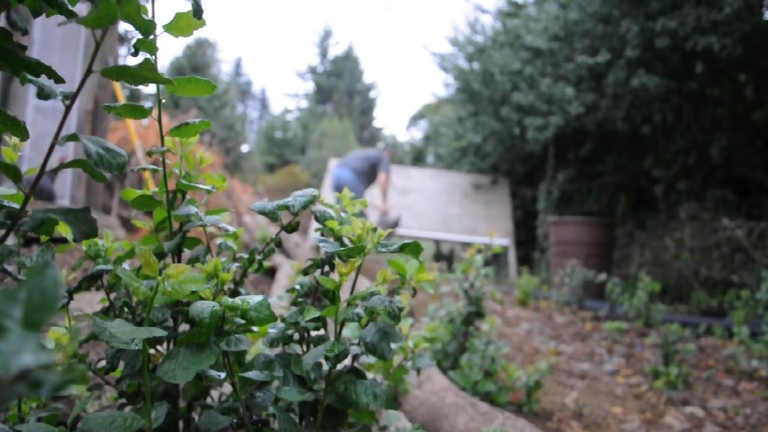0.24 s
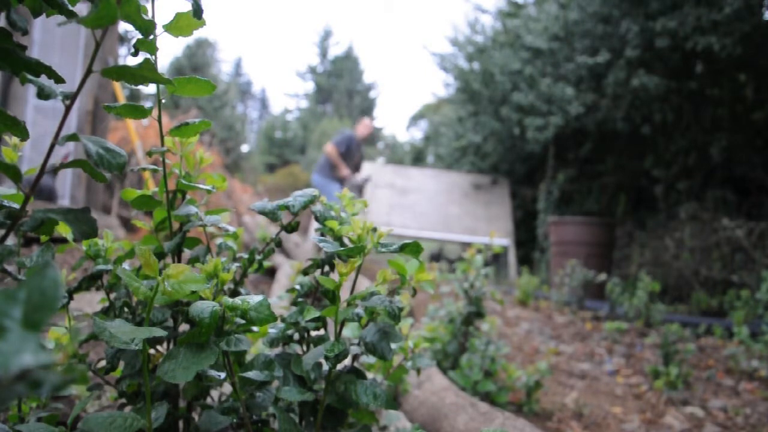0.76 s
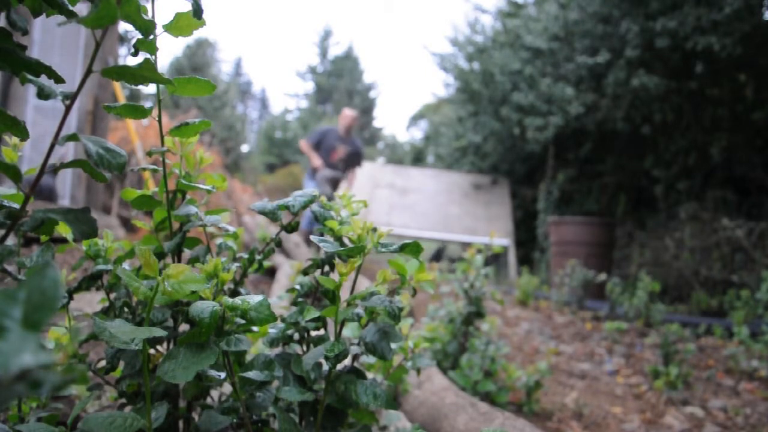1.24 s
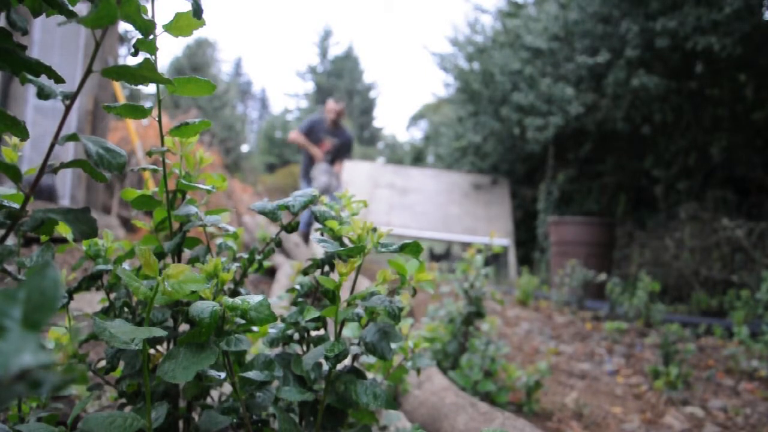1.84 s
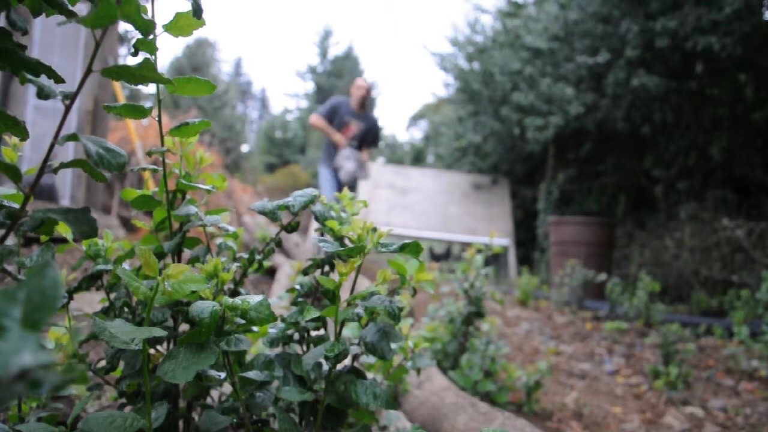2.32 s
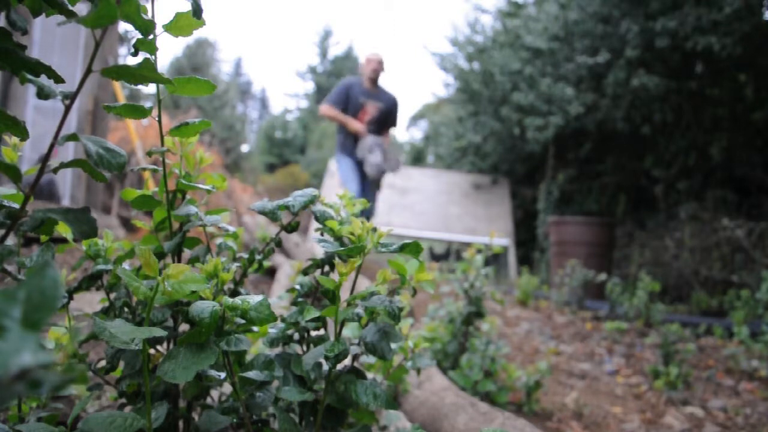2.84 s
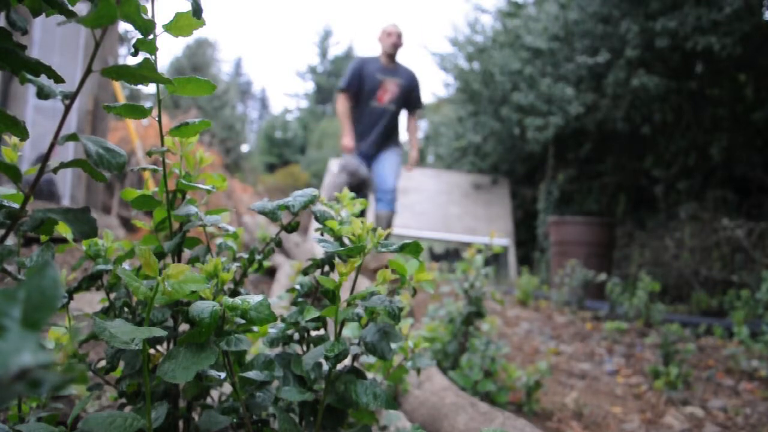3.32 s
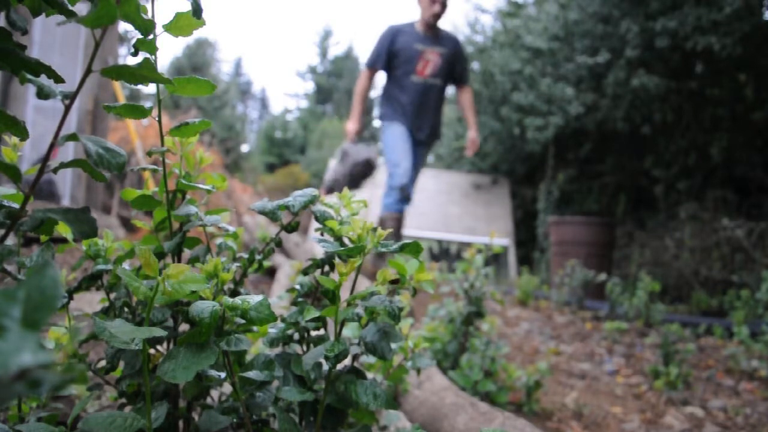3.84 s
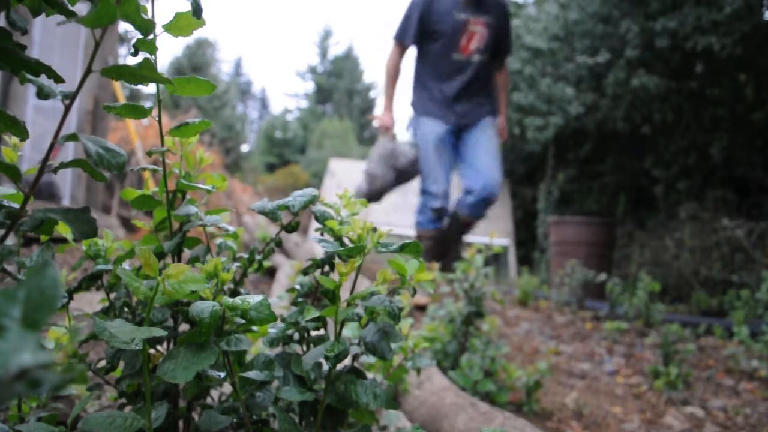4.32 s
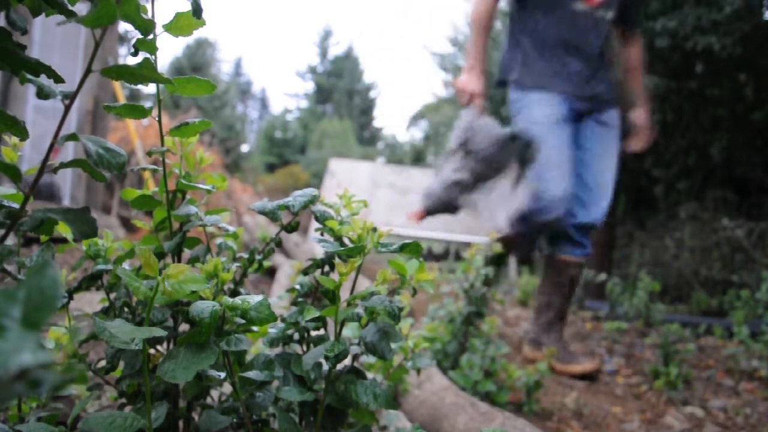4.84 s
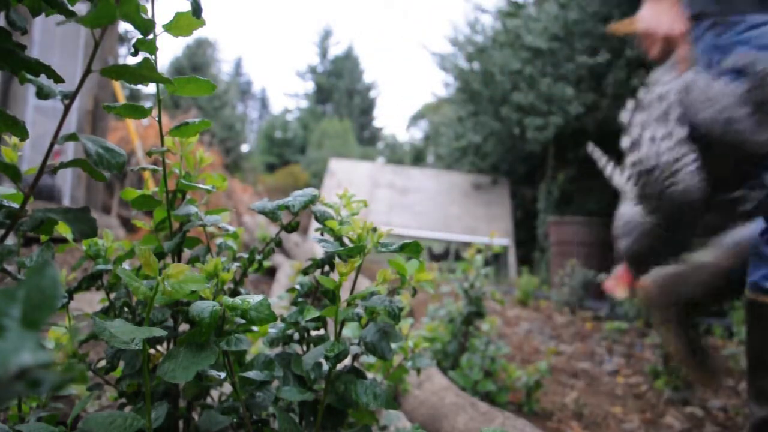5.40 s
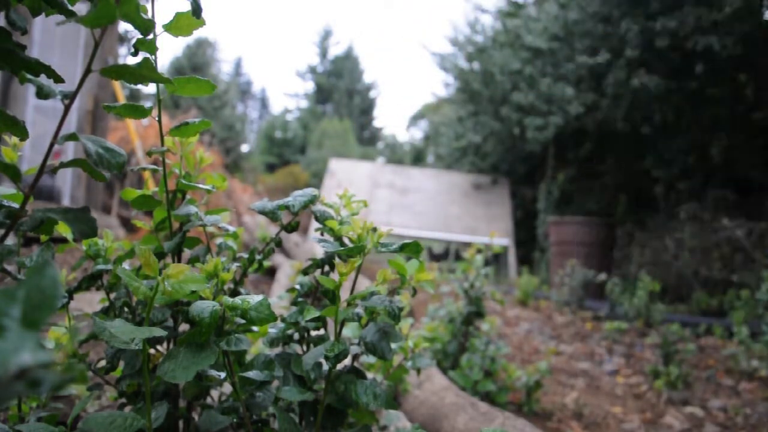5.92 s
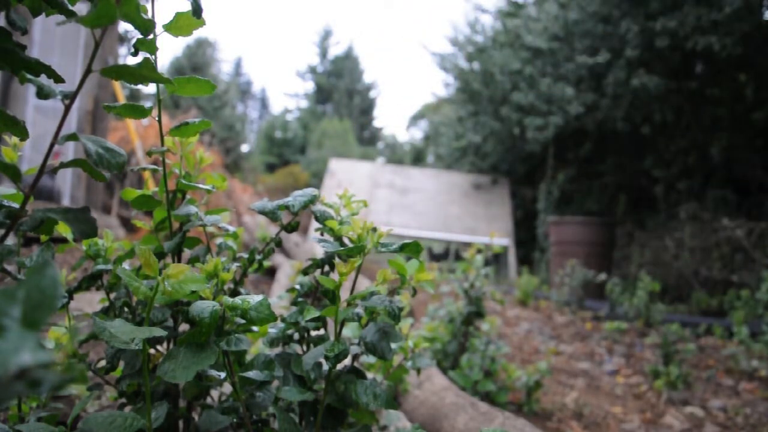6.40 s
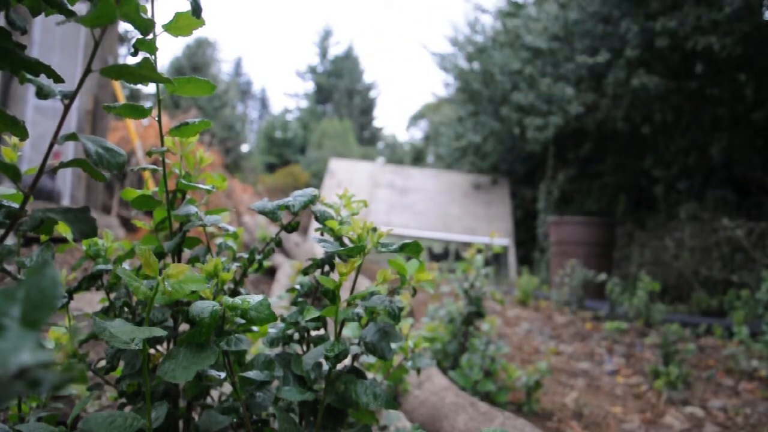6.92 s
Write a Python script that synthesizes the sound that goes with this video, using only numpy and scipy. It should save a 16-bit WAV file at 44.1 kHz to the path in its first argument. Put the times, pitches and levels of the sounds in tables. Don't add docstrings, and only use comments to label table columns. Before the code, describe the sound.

In an outdoor garden, a wooden coop lid slams and rattles to rest. One hen gives broken, whistling squawks while another clucks steadily, growing nearer as it is carried past. A farther hen grunts hoarsely. Feathers and leaves brush by, twigs snap and boots press crumbly soil. Distant traffic and leaves lie beneath. A small camera microphone among the leaves gives a narrow, dull, slightly clipped sound.

```python
import sys
import numpy as np
from scipy import signal
from scipy.fft import rfft, irfft, next_fast_len
from scipy.io import wavfile
from scipy.ndimage import uniform_filter1d, minimum_filter1d, map_coordinates

SR = 44100
rng = np.random.default_rng(int(sys.argv[2]) if len(sys.argv) > 2 else 0)


def unload_wav(signal):
    wavfile.write(
        sys.argv[1],
        SR,
        np.round(np.clip(np.atleast_2d(signal).T, -1, 1) * 32767).astype(np.int16),
    )


def invert_db(level):
    return 10 ** (np.asarray(level, dtype=float) / 20)


N = 315756

# centre in Hz, width in Hz, level in dB.
BEAK = [(2800, 300, 0), (3700, 330, 0), (4250, 350, -9)]


def unit(x):
    return x / np.sqrt(np.mean(x ** 2) + 1e-20)


def along(points, hz):
    f, v = np.transpose(points)
    return np.interp(np.log(hz + 1), np.log(f + 1), v)


def wobble(rate, size=N):
    knots = rng.standard_normal(int(size * rate / SR) + 4)
    return map_coordinates(knots, [np.arange(size) * rate / SR])


def phase(hz):
    return 2 * np.pi * np.cumsum(hz) / SR


def filtered(x, response):
    m = next_fast_len(len(x) + SR // 4)
    return irfft(rfft(x, m) * response(np.fft.rfftfreq(m, 1 / SR)), m)[:len(x)]


def resonant(modes):
    return lambda f: sum((-1) ** k * invert_db(db) * 1j * f * w / (c * c - f * f + 1j * f * w)
                         for k, (c, w, db) in enumerate(modes))


def spell(t, start, end, edge=0.0003):
    return np.clip(np.minimum(t - start, end - t) / edge, 0, 1)


def call(rows, edge):
    s, *cols = np.transpose(rows)
    t = np.arange(s[0], s[-1], 1 / SR)
    return round(s[0] * SR), t, spell(t, s[0], s[-1], edge), [np.interp(t, s, c) for c in cols]


def air():
    # time in seconds, traffic in dB, leaves in dB.
    air_levels = [(0.0, -37, -58.5), (0.56, -45, -47), (1.11, -46.5, -45.5), (1.25, -46, -43.5),
                  (1.91, -43, -45.5), (2.77, -47, -48), (3.6, -43.5, -41.5), (4.4, -41.5, -43.5),
                  (5.3, -41.5, -44.5), (6.2, -42, -45.5), (7.16, -40, -46.5)]
    # frequency in Hz, density in dB per Hz.
    traffic_shape = [(12, -50.5), (20, -6.5), (123, -9.5), (220, -9.5), (362, -11), (500, -15), (650, -37),
                     (1100, -120)]
    leaves_shape = [(150, -37.5), (250, -27), (363, -12), (736, -13), (865, -8.5), (908, -12.5),
                    (2060, -19), (2250, -16.5), (2420, -24), (4850, -20.5), (6300, -79), (10700, -120)]
    _, _, _, levels = call(air_levels, edge=.01)
    traffic_db, leaves_db = [np.pad(db, (0, N), "edge")[:N] for db in levels]

    def rush(shape):
        return unit(filtered(rng.standard_normal(N), lambda f: invert_db(along(shape, f))))

    traffic = invert_db(traffic_db + 1.5 * wobble(8)) * rush(traffic_shape)
    leaves = invert_db(leaves_db + 1.5 * wobble(14)) * rush(leaves_shape)
    return traffic + leaves


def lid():
    # frequency in Hz, level in dB, 60 dB decay in seconds.
    lid_modes = [(85.7, -29.5, 0.72), (161, -13, 0.73), (221, -10.5, 0.074), (286, -6, 0.16),
                 (413, -11.5, 0.097), (513, 0, 0.05)]
    # time in seconds, boards in dB, crack in dB.
    contacts = [
        (0.0314, -1.5, -25),
        (.037, -6.5, -7.5),
        (0.0408, 0, 2.5),
        (0.0434, -1.5, -5.5),
        (0.065, -10.5, -38.5),
        (.074, -11, -43.5),
        (.091, -15.5, -31.5),
    ]
    out, t = np.zeros(N), np.arange(SR // 2) / SR
    for s, db, crack_db in contacts:
        ring = sum(invert_db(level + rng.normal(0, 3) - 60 * t / t60) * np.sin(2 * np.pi * hz * t)
                   for hz, level, t60 in lid_modes)
        knock = invert_db(-60 * t / 0.036) * np.sin(2 * np.pi * 215 * t)
        knock += invert_db(0.5 - 60 * t / 0.018) * np.sin(2 * np.pi * 400 * t)
        splinter = filtered(rng.standard_normal(len(t)), lambda f: 1 / (1 + 1j * f / 1500))
        crack = invert_db(crack_db + 9.5 - 60 * t / 0.011) * splinter
        onset = np.sin(np.minimum(t / 0.0026, 1) * np.pi / 2) ** 2
        blow = onset * invert_db(db) * (invert_db(-17.0) * ring + 1.2 * knock)
        out[round(s * SR):][:len(t)] += blow + np.minimum(t / 0.0011, 1) * crack
    return out


def shiver():
    # Start, time the hum starts to die and end in seconds, then hum in dB, grit in dB.
    start, dies, end, low_db, grit_db = (.044, .21, .4, -22, -21)
    # frequency in Hz, level in dB.
    board_modes = [(72, -5), (100, -10), (166, 0), (215, -6), (320, -13)]
    t = np.arange(N) / SR
    hum = sum(invert_db(db + 3 * np.tanh(wobble(40))) * np.sin(2 * np.pi * hz * t + .8 * wobble(40))
              for hz, db in board_modes)
    grit = unit(filtered(rng.standard_normal(N), resonant([(500, 1100, 0)])))
    settling_db = -40 * np.maximum(dies - .06 - t, 0) - 75 * np.maximum(t - dies, 0)
    rumble = invert_db(settling_db) * (invert_db(low_db) * hum + invert_db(grit_db - 13.5) * grit)
    trickle = invert_db(grit_db - 60 * (t - start) / 0.11) * grit
    return spell(t, start, end, edge=0.018) * rumble + spell(t, start, end) * trickle


def chirp(s, length, from_hz, to_hz, db):
    peak = 0.75
    bend, edge_db, closing_db, third_db = 2.4, 16.5, -26, -30.5
    rows = [(s + u * length, from_hz + u ** bend * (to_hz - from_hz), db - edge * edge_db, u * closing_db - 5)
            for u, edge in [(0, 1), (peak / 2, .5), (peak, 0), (1, 1)]]
    return rows, third_db, 0


def squawks():
    # time in seconds, pitch in Hz, loudest tone in dB,
    # beak opening (second tone over first) in dB.
    rising = [(.27, 833, -46, -7), (.285, 915, -33.5, -9.5), (.33, 993, -30, -5.5),
              (.36, 1094, -20.5, -2.5), (.38, 1127, -21.5, -5.5), (.387, 1220, -49.5, -18)]
    onset = [(1.157, 598, -29, -1), (1.166, 607, -24.5, 7.5), (1.18, 643, -19, 8.5), (1.188, 624, -25.5, 6),
             (1.2, 648, -34, -10.5)]
    scream = [(1.176, 830, -37.5, -10), (1.186, 829, -20, -23), (1.202, 851, -13.5, -13),
              (1.228, 838.6, -9.5, -26), (1.27, 846.5, -10.5, -14), (1.292, 844.5, -12, -31),
              (1.306, 862, -12.5, -18), (1.326, 844, -11, -27), (1.34, 797, -23, -25)]
    rattle = [(2.21, 735, -44, -1.5), (2.23, 870, -31, -11), (2.27, 804, -27, 2.5), (2.328, 847, -19, 7),
              (2.332, 1120, -18.5, -6.5), (2.345, 1160, -33.5, 1)]
    yelp = [(2.37, 830, -42.5, 6.2), (2.378, 812, -26, 4.3), (2.386, 732, -18, 8), (2.394, 725, -13.5, 26),
            (2.397, 583, -22, 18), (2.403, 590, -20.5, 16), (2.408, 607, -40, 6)]
    sliding = [(2.6, 870, -37, -15.5), (2.615, 975, -28.5, 3.5), (2.627, 964, -18, 6.5),
               (2.64, 896, -16.5, 2.5), (2.648, 843, -20, 0)]
    falling = [(2.646, 851, -21, 2.5), (2.655, 792, -12.5, 9.8), (2.663, 754, -2, 19),
               (2.68, 780.4, -13, 44), (2.693, 726, -10, 23)]
    low = [(2.694, 665, -21.5, 11), (2.708, 574, -12, 10), (2.725, 579, -11, 11), (2.743, 564, -11.5, 9.2),
           (2.753, 575, -48.5, 6)]
    high = [(2.902, 930, -45.5, -16), (2.92, 1013, -21, 8.5), (2.94, 942, -11.5, 1),
            (2.955, 976, -12.5, 0.5), (2.97, 1003, -13, 10.5), (2.978, 1016, -30, -2.5)]
    dropped = [(2.98, 595, -4.5, 17), (2.984, 595.6, -6, 17), (3.0, 580.5, -10.5, 16), (3.035, 563, -9, 16),
               (3.045, 545, -31.5, 8.6)]
    faint = [(3.36, 793, -45, -26), (3.45, 813, -43, -4), (3.53, 746, -48.5, -3)]
    arched = [(5.098, 739, -32.5, -12), (5.125, 800, -28, -6), (5.14, 743.5, -21, 7), (5.17, 768, -19.5, 9),
              (5.2, 787, -22, 9), (5.225, 804, -24, 3.5), (5.255, 725, -43.5, 1)]
    gasp = [(5.266, 731, -36, 7.4), (5.276, 740, -14, 14.8), (5.29, 714, -17.5, 6.1)]
    # curve, third tone against the loudest in dB, the tones above in dB.
    held = [(rising, -27.5, 0), (onset, -6.5, 0), (scream, -20, 2.5), (rattle, -14, -3), (yelp, 0, -6),
            (sliding, -21.5, 0), (falling, -6, -5.5), (low, -5.5, 1.3), (high, -20, 3.3),
            (dropped, -15, 2.9), (faint, -26, 0), (arched, -16, 2.4), (gasp, -11, 0)]
    fourths = [5, -5.5, 7, -2.5, -0.5, -2, 2.5, 5, 1.5, 2, -10, -6.5, -1.5]
    # start in seconds, length in seconds, from Hz, to Hz, peak in dB.
    chirps = [
        (.42, 0.029, 773, 1596, -22.5),
        (0.481, 0.024, 893, 1596, -17),
        (0.524, 0.025, 1120, 1260, -44),
    ]
    # start and end in seconds, throb in Hz, throb depth 0-1, hoarseness 0-1.
    breaks = [(.27, .36, 95, .2, .16), (1.15, 1.205, 310, .1, .3), (1.195, 1.31, 300, 0, .035),
              (1.3, 1.35, 200, 0, .15), (2.21, 2.33, 103, .45, .12), (2.37, 2.42, 150, .1, .1),
              (2.645, 2.705, 125, .3, .12), (2.72, 2.76, 145, .1, .08), (2.9, 2.93, 150, .2, .2),
              (2.975, 2.986, 300, .1, .2), (3.35, 3.54, 90, .2, .2), (5.095, 5.26, 58, .55, .17),
              (5.26, 5.3, 90, 0, .2)]
    # start and end in seconds, half-pitch tones in dB.
    halvings = [
        (1.155, 1.211, -4),
        (1.271, 1.344, -9.5),
        (2.694, 2.76, -19.5),
        (2.98, 3.027, -42.5),
    ]
    # frequency in Hz, level in dB.
    upper = [(1700, 17), (2600, -2.5), (3400, -1.5), (4200, -5.5), (5000, -11.5)]
    # centre in Hz, width in Hz, level in dB.
    rasp_air = [(1400, 2700, -0.5), (2170, 420, 0), (3500, 1900, -1)]
    out, air_gain = np.zeros((2, N))
    notes = held + [chirp(*row) for row in chirps]
    for (rows, third_db, upper_db), fourth_db in zip(notes, fourths + [0] * len(chirps)):
        at, t, gate, (hz, db, open_db) = call(rows, edge=0.0015)
        n = len(t)
        first_db, second_db = db - np.maximum(open_db, 0), db + np.minimum(open_db, 0)
        third_db = third_db + db + .9 * (db - db.max())
        hoarse = .045 + sum(spell(t, a, b, edge=.005) * rough for a, b, _, _, rough in breaks)
        throb = 1 + sum(spell(t, a, b) * depth * np.sin(phase(rate * (1 + 0.21 * wobble(44, n))))
                        for a, b, rate, depth, _ in breaks)
        halved = sum(spell(t, a, b, edge=0.021) * invert_db(half_db) for a, b, half_db in halvings)
        turn = phase(uniform_filter1d(hz, size=90) * (1 + 0.0044 * wobble(59.6, n))) + hoarse * wobble(550, n)

        sizes = {1: invert_db(first_db), 2: invert_db(second_db), 3: invert_db(third_db + 2.3 * wobble(40, n))}
        for k in range(4, 9):
            tilt_db = along(upper, k * hz) - along(upper, 3 * hz)
            waxing_db = 3.5 * wobble(37, n)
            sizes[k] = invert_db(third_db + upper_db + 0.29 * (db - db.max()) + tilt_db + waxing_db)
        sizes[4] = sizes[4] * invert_db(fourth_db)
        for k in np.arange(8) + .5:
            sizes[k] = halved * invert_db(db - 16 * abs(np.log2(k * hz / 2150)) + 3.5 * wobble(28, n))
        tone = sum(size * np.sqrt(2) * np.sin(k * turn + rng.uniform(0, 2 * np.pi)) for k, size in sizes.items())
        out[at:at + n] += gate * tone * throb * (1 + 0.17 * hoarse * wobble(650, n))
        air_gain[at:at + n] += gate * (hoarse - .033) * invert_db(db - 2.5 + 5.5 * wobble(120, n))
    return out + filtered(air_gain * rng.standard_normal(N), resonant(rasp_air))


def snaps(hz, rasp):
    n = len(hz)
    cycles = .55 + np.cumsum(hz * (1 + .4 * rasp * wobble(260, n))) / SR
    sizes = invert_db(10 * rasp * np.tanh(rng.standard_normal(n)))
    snap = np.diff(np.floor(cycles), prepend=0) * sizes
    hiss = rng.standard_normal(n) * np.exp(-3 * (cycles % 1))
    return unit(unit(snap) + .9 * rasp * unit(hiss)), cycles


def clucks():
    # start in seconds, length in seconds,
    # settled pulse rate in Hz, throat in dB, mouth opening in dB.
    far_clucks = [(0.362, 0.1, 347.3, -35, 0), (0.615, 0.068, 333, -35.5, -3.5),
                  (0.821, 0.09, 347.6, -33.5, 0), (1.016, 0.069, 284.8, -29.5, 2),
                  (1.155, 0.067, 324.4, -34, 7.5), (1.38, 0.096, 330.8, -30.5, -9.5),
                  (1.62, 0.081, 332.3, -34, -11), (1.864, 0.068, 329.6, -30, -3.5),
                  (2.111, 0.08, 327, -31.5, -4), (2.406, 0.056, 298.2, -29, -2),
                  (2.647, 0.064, 326.8, -23.5, 4), (2.904, 0.061, 341, -24, 2.5),
                  (3.189, 0.08, 367.3, -26, -2)]
    near_clucks = [(3.523, 0.051, 340, -25, -1.5), (3.816, .053, 231.4, -30, 3),
                   (4.0, 0.052, 385.2, -19.5, 2.5), (4.234, 0.048, 347.9, -19, 1),
                   (4.463, 0.054, 371, -19, 3.5), (4.722, 0.066, 319.5, -21.5, 4),
                   (4.987, 0.053, 286.6, -21.5, 4), (5.28, 0.038, 341, -13, 4.5),
                   (5.549, 0.062, 274, -18, 4), (5.957, 0.091, 218.1, -22, 0),
                   (6.3, 0.07, 248.6, -20.5, -2.5), (6.891, 0.052, 319.6, -17.5, 2)]
    rasps = [.08, .35, .3, .25, .2, .2, .18, .2, .25, .36, .2, .2, .05, .13, .4, .15, .2, .22, .33, .36, .2,
             .4, .45, .36, .09]
    # swell from start to end in dB, beak turned to or from the camera in dB.
    turns = [(-0.5, -3.5), (-6, -1), (-4.5, -2), (-4, -3.5), (-8, 9.5), (12.5, -2), (-11.5, -3.5),
             (-6.5, -2), (-3.5, 0), (-11, -2), (-10, 0), (-2, -1), (2.5, -7), (8, -5.5), (-9, 2.5),
             (0.5, -3.5), (-1, 1), (-0.5, 2), (1, 3.5), (2, 7), (2, -1.5), (-4.5, 3.5), (-2, 1.5),
             (2.5, -1), (5.5, -4.5)]
    stretches = [0.0021, -0.02, 0.0098, -0.043, 0.019, -0.0061, 0.026, -0.1, 0.02, -0.017, 0.039, -0.019,
                 0.0014, -0.053, 0.0033, -0.036, 0.031, 0.021, -0.0021, -0.04, -0.049, -0.0085, 0.0073,
                 0.015, 0.0058]
    # centre in Hz, width in Hz, level in dB.
    windpipe_modes, mouth_modes = [(647, 390, -1.5)], [(1300, 137, 3.5), (1540, 470, -3), (2126, 560, -11)]
    # centre in Hz, width in Hz, level in dB.
    far_beak = [(3125, 480, 3.5), (3830, 220, -2), (2500, 300, -2.5)]

    def walls(f):
        return 1 / (1 + (f / 2300) ** 10) ** .5 / (1 + 1j * f / 4000)

    out = np.zeros(N)
    each = zip(far_clucks + near_clucks, rasps, turns, stretches)
    for k, ((s, length, hz, db, open_db), rasp, (swell_db, turn_db), stretch) in enumerate(each):
        at, t, gate, (u,) = call([(s, 0), (s + length, 1)], edge=.002)
        n, near = len(t), k >= len(far_clucks)
        rise = 0.3 * max(1 - rasp / .5, 0) * np.exp((s - t) / 0.016)
        hz = hz * (1 - rise - .07 * u ** 2)
        db = db - 4 * np.exp((s - t) / 0.02) - 6.5 * u ** 3 + swell_db * (u - .5)
        chest_db = (-6.5 if near else -4.5) - 0.66 * open_db
        beak_db = (-7.5 if near else -2) - 10 * rasp + turn_db
        source, cycles = snaps(hz * (1 - 0.29 * np.exp((t[0] - t) / 0.0046)), rasp)
        breath = (.15 + rasp) * rng.standard_normal(n) * np.exp(-2 * (cycles % 1))
        opening_db = open_db + 9 * (u - .5)
        fade = gate * np.clip((t[-1] + .002 - t) / .009, 0, 1)
        scale = 1 + np.clip(stretch, -.15, .15)

        def patch(depth_db):
            return fade * invert_db(db + depth_db * wobble(70, n))

        def ring(x, response):
            return filtered(np.pad(x, (0, 900)), lambda f: response(f / scale))

        pipe = ring(patch(2.8) * invert_db(14.5 - opening_db / 2) * source,
                    lambda f: resonant(windpipe_modes)(f) * walls(f))
        mouth = ring(patch(2.0) * invert_db(14.5 + opening_db / 2) * (source + breath),
                     lambda f: resonant(mouth_modes)(f) * walls(f))
        effort = invert_db(beak_db + 13.5) * np.sin(np.pi * u ** 0.87)
        beak = sum(ring(patch(2) * effort * (source + 1.3 * breath),
                        lambda f: invert_db(top_db) * resonant([(c, 2.1 * w, 0)])(f) ** 2)
                   for c, w, top_db in (BEAK if near else far_beak))
        out[at:][:n + 900] += mouth - pipe + beak
        hum = np.cos(2 * np.pi * cycles + 0.015) * (1 + rasp * wobble(150, n))
        out[at:][:n] += spell(t, t[0], t[-1]) * invert_db(db + chest_db + 2.5) * hum
    return out


def grunts():
    # peak time in seconds, peak in dB, beak against it in dB.
    grunt_calls = [
        (3.36, -27, -15),
        (3.71, -20, -18),
        (3.897, -22.5, -27),
        (4.074, -26, -12.5),
        (4.452, -24, -13),
        (4.657, -22.5, -40),
        (4.878, -20.5, -24),
        (5.924, -21, -34),
    ]
    low, high = np.zeros((2, N))
    u = np.arange(0, 1, 1 / (0.046 * SR))
    for s, db, beak_db in grunt_calls:
        pulses = snaps(250 + 60 * u, 1.0)[0] + rng.standard_normal(len(u))
        source = np.sin(np.pi * u ** 0.83) * np.clip(pulses, -2.5, 2.5)
        at = round((s - .012) * SR)
        low[at:][:len(u)] += invert_db(db + 5.5) * source
        high[at:][:len(u)] += invert_db(db + beak_db + 8.5) * source
    throat = resonant([(830, 264, 3.5), (1200, 70, 1.5)])
    return filtered(low, throat) + filtered(high, resonant(BEAK))


def songbird():
    start, end, hz, db = (3.55, 3.87, 3620, -57)
    t = np.arange(N) / SR
    whistle = np.sin(phase(hz * (1 + .02 * wobble(55))))
    return spell(t, start, end) * invert_db(db + 6.4 * wobble(56)) * whistle


def brushes():
    # start in seconds, length in seconds, centre in Hz, level in dB.
    swells = [(4.05, .17, 1000, -49), (4.284, 0.11, 900, -41), (4.613, 0.16, 800, -42),
              (5.096, 0.25, 1086, -34), (5.378, 0.2, 800, -44), (5.666, .1, 1200, -48),
              (5.816, 0.092, 700, -54.5), (6.026, .13, 800, -37.5), (6.433, 0.091, 900, -49),
              (6.598, 0.2, 1100, -45.5), (6.651, 0.073, 4000, -52), (6.765, 0.097, 4000, -45.5),
              (7.023, 0.075, 900, -47)]
    out = np.zeros(N + SR)
    for s, length, hz, db in swells:
        u = np.arange(0, 1, 1 / (length * SR))
        grit = invert_db(4 * wobble(150, len(u))) * rng.standard_normal(len(u))
        rustle = unit(filtered(grit, lambda f: resonant([(hz, 1600, 0)])(f) ** 2))
        out[round(s * SR):][:len(u)] += invert_db(db) * np.sin(np.pi * u) * rustle
    return out[:N]


def boots():
    # time in seconds, peak in dB, pitch in Hz.
    twigs = [(4.335, -28, 3730), (4.379, -22.5, 3060), (4.637, -22, 904), (4.683, -24, 3500),
             (4.694, -10, 790), (5.094, -19, 866), (5.218, -26, 2500), (5.25, -26, 4210),
             (5.421, -33.5, 4000), (6.094, -18.5, 1780), (6.817, -32.5, 837)]
    # time in seconds, peak in dB, pitch in Hz.
    clods = [(4.38, -24.5, 450), (5.409, -44, 580), (5.726, -20.5, 900), (5.776, -25, 790),
             (5.813, -30, 600), (5.894, -25, 794), (6.125, -22.5, 864), (6.477, -32, 694),
             (6.494, -21, 600), (6.513, -32.5, 810), (6.646, -29, 1000), (6.665, -29.5, 1470),
             (6.701, -36, 1340), (6.719, -28, 1250), (6.731, -30, 1400), (7.017, -20.5, 770),
             (7.027, -37.5, 1400), (7.059, -38, 1600), (7.074, -31.5, 1600)]
    # time in seconds, peak in dB, push in Hz, crunch against it in dB.
    treads = [(5.135, -16, 122.6, -2.5), (5.715, -7.5, 151.6, -4), (5.773, -16.5, 297, -22.5),
              (5.808, -27.5, 192.5, -24), (5.892, -16, 330, -22), (6.113, -23, 215, -5),
              (6.234, -34, 201, 11), (6.396, -15.5, 289, -33), (6.453, -22, 134.2, -23),
              (6.496, -24.5, 130, -2), (6.516, -23.5, 259, -25), (6.696, -15.5, 263, -15),
              (6.723, -23.5, 278, -9), (7.02, -23, 130, 3), (7.05, -29, 89.7, -15)]
    push, crunch, click = np.zeros((3, N + SR))
    t = np.arange(SR // 10) / SR
    n = len(t)
    for s, db, hz, crunch_db in treads:
        at = round((s + 0.01) * SR)
        turn = phase(hz * (.85 + .45 * np.exp(-t / 0.004))) + 1.0 * wobble(170, n)
        push_db = db - 3.0 - 60 * t * hz / 15 + 3.2 * wobble(74, n)
        push[at:][:n] += invert_db(push_db) * (1 - np.exp(-t / .002)) * np.sin(turn)
        soil_db = db + .5 * crunch_db + 8.0 - 60 * t / 0.064 + 1.1 * wobble(260, n)
        crunch[at:][:n] += np.minimum(t / 0.00077, 1) * invert_db(soil_db) * rng.standard_normal(n)
    for s, db, hz in twigs:
        snap = filtered(invert_db(-60 * t / 0.0055) * rng.standard_normal(n), resonant([(hz, 1100, 0)]))
        click[round(s * SR):][:n] += invert_db(db + 2.0) * snap / abs(snap).max()
    for s, db, hz in clods:
        burst = (1 - np.exp(-t / .001)) * invert_db(-60 * t / 0.014) * rng.standard_normal(n)
        crumb = filtered(burst, lambda f: resonant([(hz, 700, 0)])(f) ** 2 / (1 + 1j * f / 2000))
        click[round(s * SR):][:n] += invert_db(db) * crumb / abs(crumb).max()
    soil = resonant([(600, 900, 0)])
    return push[:N] + filtered(crunch[:N], lambda f: soil(f) ** 2 + .035) + click[:N]


def garden(x):
    # frequency in Hz, 60 dB decay in seconds.
    tree_decay = [(200, 0.34), (1000, 0.074), (4000, 0.34)]
    # delay in seconds, smear in seconds, level in dB.
    echoes = [
        (.033, 0.013, -19.5),
        (.075, .02, -28),
        (.13, 0.044, -32),
        (0.203, .05, -30),
    ]
    hz, t, z = signal.stft(rng.standard_normal(SR), SR, nperseg=256)
    tail = signal.istft(z * invert_db(-60 * t / along(tree_decay, hz)[:, None]), SR, nperseg=256)[1]
    tail = invert_db(-8.5) * np.pad(tail / np.linalg.norm(tail), (600, 0))
    n = SR // 10
    for s, smear, db in echoes:
        scatter = rng.standard_normal(n) * np.exp(-np.arange(n) / (smear * SR))
        tail[round(s * SR):][:n] += invert_db(db) * scatter / np.linalg.norm(scatter)
    return filtered(signal.fftconvolve(x, tail)[:N], lambda f: 1 / (1 + 1j * f / 3800) ** 2)


def scene():
    slam, calls = lid(), squawks()
    near = clucks() + grunts() + brushes() + boots()
    answer = garden(calls + invert_db(-13.5) * slam + invert_db(-5.0) * near)
    return (air() + slam + shiver() + calls + near + songbird() + answer)[None]


def band_limit(x):
    return signal.sosfilt(signal.butter(12, 5000, fs=SR, output="sos"), x)


def record(dry):
    # frequency in Hz, level in dB.
    mic = [(20, -10.5), (100, 4), (4000, -3), (4700, -14), (5000, -21.5), (5250, -84)]
    x = filtered(dry[0], lambda f: invert_db(along(mic, f)))
    top = np.where(np.arange(N) < SR // 2, 1.7, .95)
    need = minimum_filter1d(np.minimum(1, top / (abs(x) + 1e-9)), size=201)
    x = filtered(x * uniform_filter1d(need, size=100), lambda f: f < 5400)
    return band_limit(np.clip(x, -1, 1)[None])


dry = scene()
out = record(dry)
unload_wav(out)
```